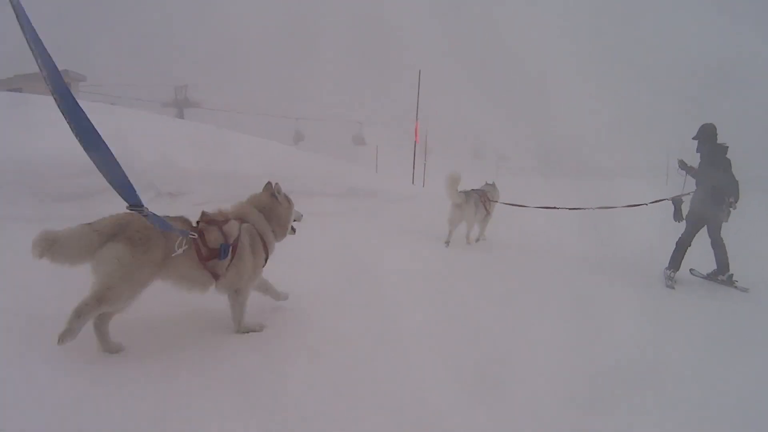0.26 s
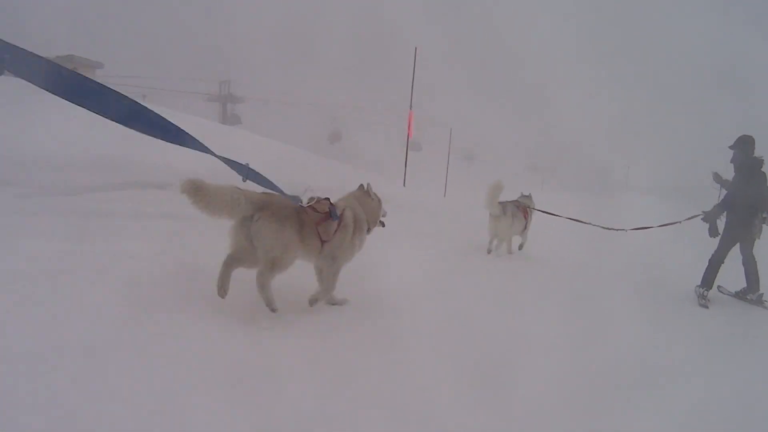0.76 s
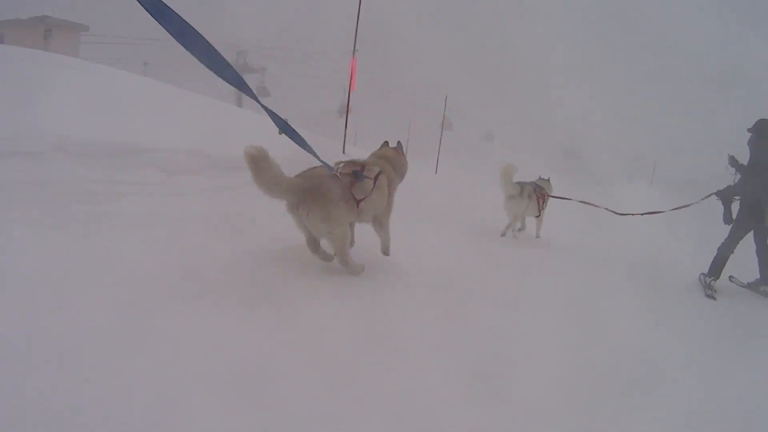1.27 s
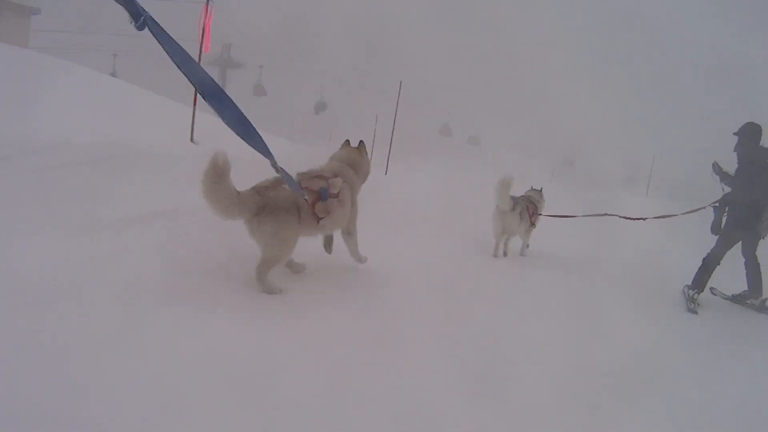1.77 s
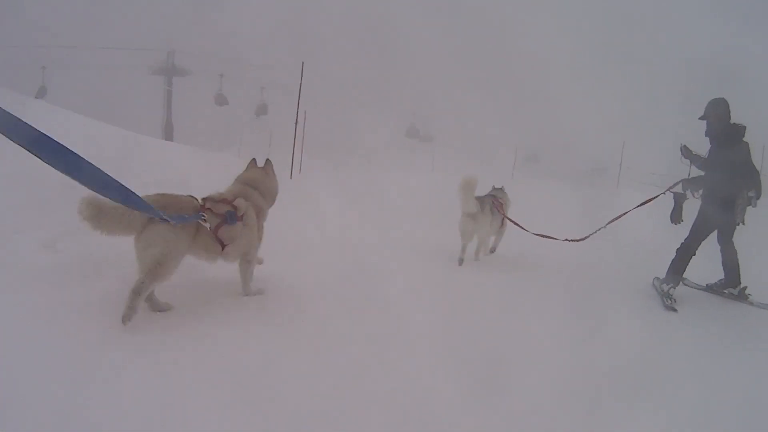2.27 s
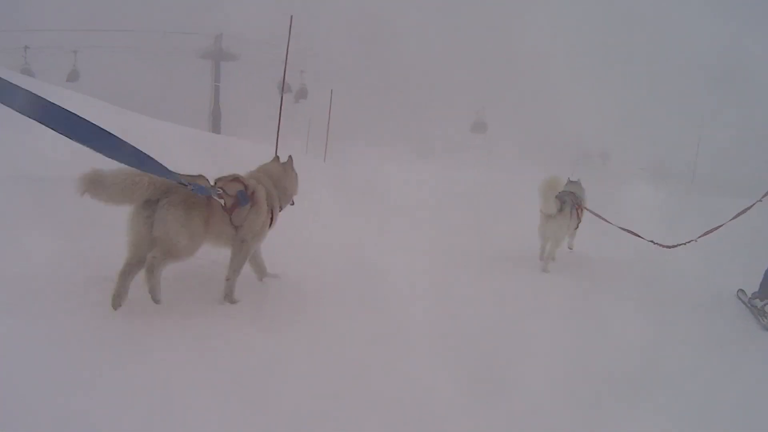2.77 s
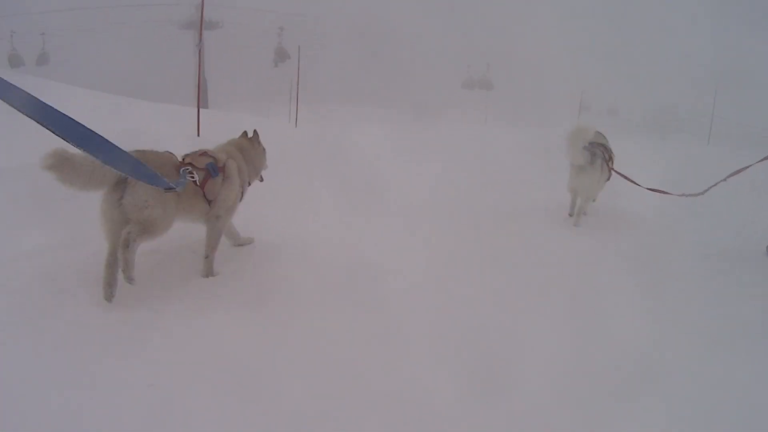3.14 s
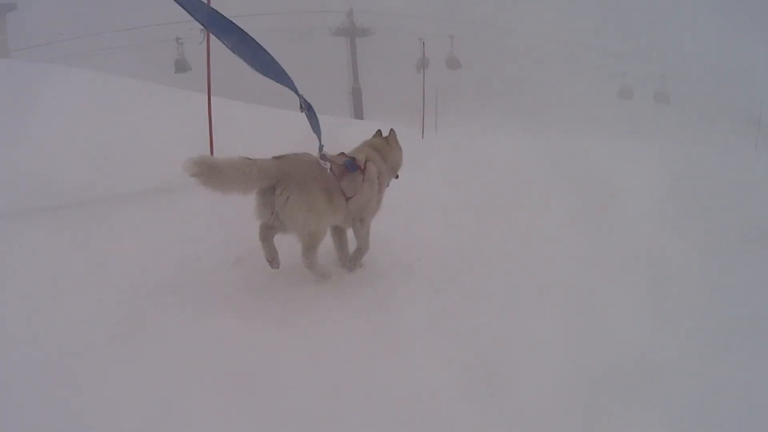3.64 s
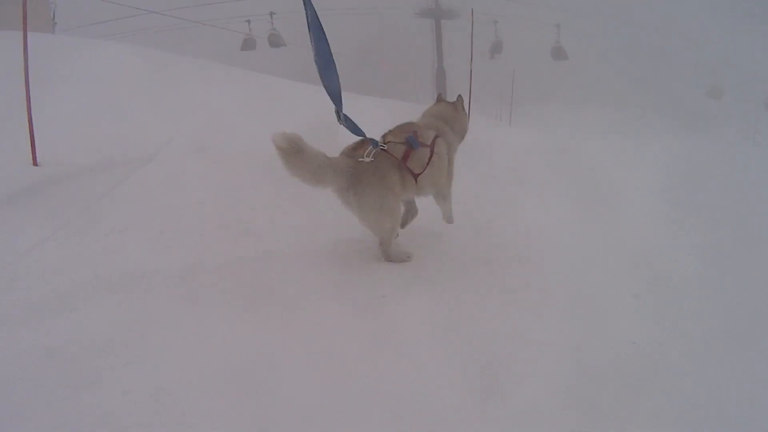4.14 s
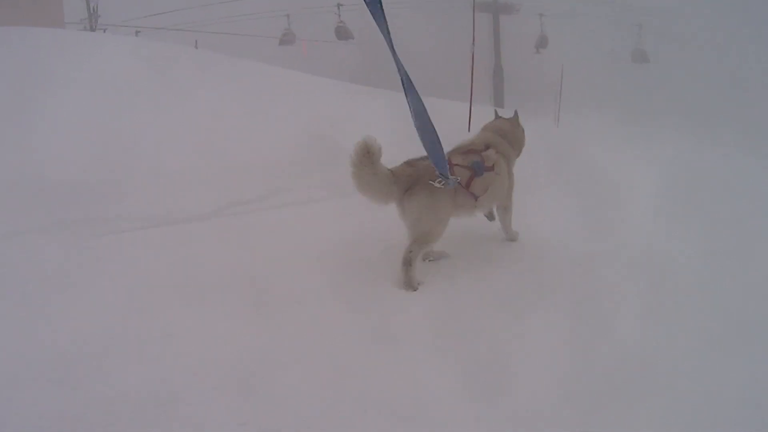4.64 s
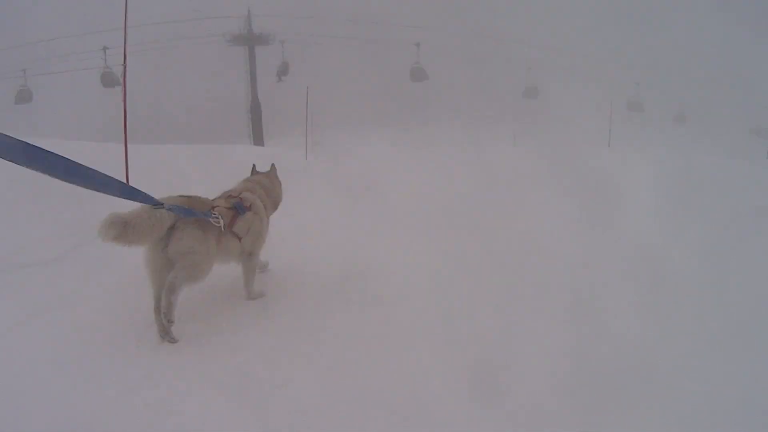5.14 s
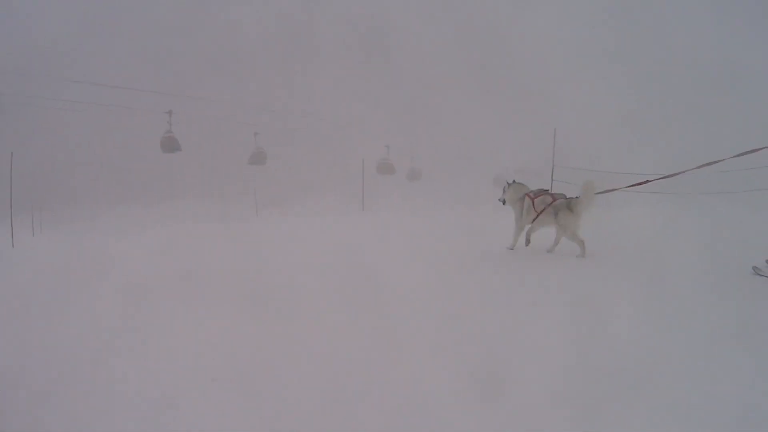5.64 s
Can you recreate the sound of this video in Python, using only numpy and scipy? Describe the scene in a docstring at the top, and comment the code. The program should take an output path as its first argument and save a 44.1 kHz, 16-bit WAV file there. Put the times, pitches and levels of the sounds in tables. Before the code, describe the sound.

Continuous gritty hiss of skis on hard, cold snow, outdoors, with a boxy, midrange-heavy, muffled camera sound in narrow stereo. Tiny cracks flutter quickly, joined by small ice ticks in the first second and a half, hollow crust crunches through the middle, then a fuller scrape with busier crackling and a sharp snap near the end. Wind is barely a rumble.

```python
"""Skis glide over cold snow, heard from inside a closed camera case. Snow crystals break under the bases as
a dense, lumpy stream of tiny cracks: noise of random grain size, split into coarse, middle and fine parts.
Crunches of crust are short swells of cracks around one pitch; snaps of ice are brief, slightly dull spits.
The case rings in broad modes that reach its two microphone ports differently, and scattered sound fills in.
A little wind rumbles underneath as low noise in short puffs."""
import sys
import numpy as np
from scipy import signal
from scipy.fft import rfft, irfft, next_fast_len
from scipy.io import wavfile
from scipy.ndimage import uniform_filter1d, map_coordinates

SR = 44100
rng = np.random.default_rng(int(sys.argv[2]) if len(sys.argv) > 2 else 0)


def store_pcm(level_fs):
    """Save levels as 16-bit WAV."""
    pcm = np.round(np.clip(level_fs, -1, 1) * 32767).astype(np.int16)
    wavfile.write(sys.argv[1], SR, np.atleast_2d(pcm).T)


N = 260190

# spectral shape of the wind, before levelling: (f/Hz, gain/dB)
WIND_COLOUR = [(12, -33), (20, 4.5), (140, -10), (200, -2), (260, -28), (440, -120)]
# stronger puffs of wind: (t/s, rise over the breeze/dB)
WIND_PUFFS = [(0.95, 9), (1.18, 7), (3.6, 4), (2.85, 5), (4.12, 11), (5.2, 7), (5.4, 11), (5.75, 0)]
# modes of the case: (f/Hz, width/Hz, left level/dB, left phase lag/rad, right level/dB, right phase lag/rad)
CASE_MODES = [(250, 170, -41.0, 2.48, -36.0, 2.66), (590, 260, -31.1, -3.0, -23.8, -2.45),
              (870, 160, -22.5, -2.41, -26.6, -2.98), (1190, 190, -3.8, -1.97, -9.7, -1.08),
              (1750, 310, -5.0, 2.48, -13.9, 2.31), (1490, 240, -7.1, -1.34, -22.3, 0.17),
              (2280, 610, -11.3, 2.18, -17.7, 1.64), (2600, 230, -14.6, 2.0, -19.5, 0.87),
              (3110, 510, 3.1, -0.36, -3.6, -1.06), (3270, 290, 1.8, -2.75, -1.4, -0.09),
              (3590, 860, -4.2, 2.2, -4.3, 2.92), (3760, 430, -10.4, -0.4, -9.6, 0.15),
              (5040, 760, -12.8, 2.48, -13.1, 2.17), (6730, 1380, -26.2, 2.94, -27.6, -2.43),
              (7410, 1220, -30.7, 0.08, -30.4, 2.6), (10530, 2540, -15.2, 2.65, -12.7, 2.84)]
# colour of the breaking crystals, on top of the modes: (f/Hz, gain/dB)
CRYSTAL_COLOUR = [(150, 0.5), (600, 1.5), (1400, 0), (2100, 1.5), (3200, 1), (5000, 1.5), (8000, 1.5),
                  (9800, -16.5), (10900, -30)]
# colour of sound scattered from all sides, unlike at the two ports: (f/Hz, gain/dB)
SCATTER_COLOUR = [(150, -37.5), (500, -30), (1200, -23), (2000, -20.5), (2500, -18), (3250, -13),
                  (4300, -22), (6000, -27), (7600, -26.5), (9500, -33.5), (10900, -60)]
# single hard snaps of ice, ahead of dulling and case: (t/s, level/dB)
ICE_SNAPS = [(0.073, -9.5), (0.532, -14), (0.902, -16), (1.054, -26), (1.098, -17), (1.256, -8),
             (1.301, -9), (1.44, -18), (1.464, -11), (1.472, -9), (2.253, -13), (3.288, -10), (4.255, -8),
             (5.33, -4), (5.353, -18), (5.458, -7.5), (5.506, -9), (5.712, -13), (5.86, -24)]
# the clearest crunches of crust, ahead of the case: (t/s, f/Hz, level/dB, swell time/s)
CRUST_CRUNCHES = [(0.28, 3120, -19, 0.0074), (0.374, 3060, -18, 0.008), (0.384, 4930, -17, 0.008),
                  (0.444, 2830, -17, 0.007), (0.575, 1330, -9, 0.0062), (0.66, 3760, -17, 0.008),
                  (0.842, 3400, -13, 0.0058), (0.844, 1410, -14, 0.0079), (1.06, 4050, -17, 0.0095),
                  (1.154, 1630, -10, 0.0051), (1.2, 3060, -14, 0.011), (1.298, 1230, -13, 0.01),
                  (1.47, 3000, -18, 0.0052), (1.505, 3040, -11, 0.003), (1.523, 3300, -17, 0.01),
                  (1.65, 1520, -18, 0.0061), (1.738, 5070, -16.5, 0.027), (1.76, 1560, -9.5, 0.011),
                  (1.814, 1170, -7.5, 0.0085), (1.942, 3240, -13, 0.0096), (2.025, 1170, -5, 0.0067),
                  (2.071, 1570, -11, 0.0099), (2.072, 3230, -12, 0.0078), (2.168, 1230, -10.5, 0.0063),
                  (2.39, 2980, -16.5, 0.019), (2.808, 1240, -10, 0.035), (2.99, 1260, -8.5, 0.012),
                  (3.359, 4630, -12, 0.0066), (3.407, 4970, -8, 0.0049), (3.408, 1250, -10, 0.011),
                  (3.72, 1240, -8, 0.008), (4.078, 1190, -10, 0.014), (4.267, 1410, -5.5, 0.0083),
                  (4.362, 1630, -12, 0.016), (4.364, 3340, -12, 0.0077), (4.683, 1230, -6, 0.016),
                  (4.824, 1180, -8, 0.01), (4.864, 1730, -8.5, 0.0091), (4.93, 1740, -10, 0.0075),
                  (5, 3440, -11, 0.014), (5.157, 1110, -6.5, 0.011), (5.198, 1610, -8.5, 0.022),
                  (5.232, 4700, -12, 0.014), (5.527, 3200, -16, 0.011), (5.536, 5850, -11, 0.0091),
                  (5.564, 3310, -11.5, 0.012), (5.715, 3050, -12, 0.0056), (5.75, 3340, -14, 0.0094),
                  (5.779, 3320, -14, 0.011), (5.783, 7270, -9, 0.0071), (5.784, 1620, -8, 0.01),
                  (5.867, 3200, -10, 0.006)]
# load on the skis, as the level of the scrape ahead of the case: (t/s, level/dB)
SKI_LOAD = [(0.0, -24.5), (0.33, -23), (0.79, -25.5), (0.84, -20), (0.89, -23), (1.22, -21.5),
            (1.36, -24.5), (1.48, -21), (2.32, -20.5), (2.4, -19), (2.58, -20), (2.71, -18), (5.26, -19.5),
            (5.44, -22), (5.57, -19.5), (5.6, -21.5), (5.8, -20.5), (5.9, -23.5)]
# how uneven the track is: (t/s, factor on the lumps)
TRACK_UNEVENNESS = [(0, 1.27), (1.5, 1.4), (2.6, 1.07), (5.0, 1.08), (5.9, 1.8)]

BREEZE_DB, BREEZE_SWELL_DB = -60, -1  # steady level, size of the slow random swell
PUFF_S = 0.059  # from the top of a puff to 1/e of its dB rise
CASE_GAIN_DB = 15.5  # from the snow to the ports
LEAN_DB, LEAN_DB_PER_S = 0.83, -0.23  # left over right: starts a little left, drifts to the right
SNAP_DECAY_S, SNAP_DULL_HZ = .0014, 4500
CRUNCH_WIDTH = 0.079  # half-width of the band, as a share of the pitch
SMALL_PER_S, SMALL_SWELL_S = 7, 0.0076  # smaller crunches fall by chance
SMALL_DB, SMALL_SPREAD_DB = 2.5, 4  # over the load, and up or down by chance
SMALL_LOW_HZ, SMALL_HIGH_HZ = 1070, 5100
COARSE_HZ, FINE_HZ = 2100, 5800  # coarse cracks lie below, fine cracks above
COARSE_DB, COARSE_GROWS, COARSE_WANDER_DB = 0.5, 0.83, .5  # trim, dB per dB of load, random wander
FINE_DB, FINE_GROWS, FINE_FADE_DB_PER_S = 2, 0.77, .5  # trim, dB per dB of load, dulling along the way
TOP_HZ = 10966  # upper band limit


def amp(db):
    """Turn dB into gain."""
    return 10 ** (np.asarray(db) / 20)


def unit(x):
    """Scale to rms 1."""
    return x / np.sqrt(np.mean(x ** 2) + 1e-20)


def along(points, hz):
    """Read a (f/Hz, value) table along a log frequency axis."""
    f, v = np.transpose(points)
    return np.interp(np.log(hz + 1), np.log(f + 1), v)


def curve(rows):
    """Draw a (t/s, value) table as one value per sample."""
    t, v = np.transpose(rows)
    return np.interp(np.arange(N) / SR, t, v)


def wobble(rate):
    """A smooth random curve with rate knots a second."""
    knots = rng.standard_normal(int(N * rate / SR) + 4)
    return map_coordinates(knots, [np.arange(N) * rate / SR])


def chatter(rate):
    """A random curve without slow drift: quick roughness only, as slow rises and falls come from the load."""
    x = wobble(rate)
    return x - uniform_filter1d(x, size=SR // 12)


def filtered(x, response):
    """Shape x by a complex response of frequency."""
    m = next_fast_len(N + SR // 2)
    return irfft(rfft(x, m) * response(np.fft.rfftfreq(m, 1 / SR)), m)[..., :N]


def cracks(channels, spread_db, patchy_db):
    """Tiny cracks: noise of spread grain size, with time-frequency patches of random gain."""
    size = amp(spread_db * np.minimum(rng.exponential(size=(channels, N)), 5.5))
    z = signal.stft(size * rng.standard_normal((channels, N)), nperseg=256)[2]

    def patches(tall, long):
        field = rng.standard_normal(z.shape[1:])
        field = uniform_filter1d(field, size=tall, axis=0)
        return unit(uniform_filter1d(field, size=long, axis=1))

    field = patches(tall=3, long=4) + 0.15 * patches(tall=4, long=12)  # small and large patches
    return unit(signal.istft(z * amp(patchy_db * field), nperseg=256)[1][:, :N])


def wind():
    """A soft low rumble, mostly common to both ports, in short puffs."""
    common, left, right = filtered(rng.standard_normal((3, N)), lambda hz: amp(along(WIND_COLOUR, hz)))
    pair = common + 0.41 * np.array([left, right])
    flutter_db = 3.2 * wobble(18) + 1.9 * wobble(25)
    puffs_db = sum(db * np.exp(-((np.arange(N) / SR - s) / PUFF_S) ** 2) for s, db in WIND_PUFFS)
    level_db = BREEZE_DB + BREEZE_SWELL_DB * wobble(4.12) + puffs_db
    return amp(level_db) * unit(pair * amp(flutter_db))


def case(x):
    """The straight stream rings the resonant modes; the scattered streams reach one port each."""
    def ports(hz):
        ring = 0
        for f, width, left_db, left_lag, right_db, right_lag in CASE_MODES:
            level = amp([[left_db], [right_db]])
            lag = np.array([[left_lag], [right_lag]])
            drive = width * (np.cos(lag) * 1j * hz + np.sin(lag) * f)
            ring = ring + level * drive / (f * f - hz * hz + 1j * hz * width)
        return ring * amp(along(CRYSTAL_COLOUR, hz))

    straight = filtered(x[:1], ports)
    scattered = filtered(x[1:], lambda hz: amp(along(SCATTER_COLOUR, hz)))
    return straight + scattered


def snaps():
    """Each snap of ice is a spit of noise that dies within milliseconds, a little dull."""
    out = np.zeros((3, N + SR))
    fade = np.exp(-np.arange(SR // 100) / SR / SNAP_DECAY_S)
    for s, db in ICE_SNAPS:
        spit = rng.standard_normal((3, len(fade))) * fade
        # every spit carries the same energy ahead of its level
        spit = spit / np.linalg.norm(spit, axis=1, keepdims=True) * np.linalg.norm(fade)
        start = round(s * SR)
        out[:, start:start + len(fade)] += amp(db) * spit
    return filtered(out[:, :N], lambda hz: 1 / (1 + 1j * hz / SNAP_DULL_HZ))


def small_crunches():
    """Chance rows like those of CRUST_CRUNCHES, louder under more load."""
    when, pitch, size = rng.random((int(SMALL_PER_S * N / SR), 3)).T
    load_db = curve(SKI_LOAD)[(when * N).astype(int)]
    level_db = load_db + SMALL_DB + SMALL_SPREAD_DB * (2 * size - 1)
    pitch_hz = SMALL_LOW_HZ * (SMALL_HIGH_HZ / SMALL_LOW_HZ) ** pitch
    return [(s, hz, db, SMALL_SWELL_S) for s, hz, db in zip(when * N / SR, pitch_hz, level_db)]


def crust():
    """Each crunch of crust is a short swell of cracks around one pitch."""
    hz, t, z = signal.stft(cracks(channels=3, spread_db=3.0, patchy_db=0.5), SR, nperseg=256)
    power = np.zeros(z.shape[1:])
    for s, pitch_hz, db, swell_s in CRUST_CRUNCHES + small_crunches():
        band = np.exp(-(np.log((hz + 1) / pitch_hz) / CRUNCH_WIDTH) ** 2)
        swell = np.exp(-((t - s) / swell_s) ** 2)
        power += amp(2 * db) * np.outer(band, swell)
    return signal.istft(z * np.sqrt(power), SR, nperseg=256)[1][:, :N]


def sizes(x):
    """Split cracks by pitch into coarse, middle and fine parts that add up to x."""
    def below(edge):
        return filtered(x, lambda hz: 1 / (1 + (hz / edge) ** 8))

    coarse = below(COARSE_HZ)
    fine = x - below(FINE_HZ)
    return coarse, x - coarse - fine, fine


def glide():
    """Breaking crystals in three streams that share the lumps of the track: one straight, two scattered."""
    load_db = curve(SKI_LOAD)
    mean_db = load_db.mean()
    swing_db = load_db - mean_db
    coarse_db = mean_db + COARSE_DB + COARSE_GROWS * swing_db + COARSE_WANDER_DB * wobble(6)
    fine_db = mean_db + FINE_DB + FINE_GROWS * swing_db - FINE_FADE_DB_PER_S * np.arange(N) / SR
    lumps_db = curve(TRACK_UNEVENNESS) * (0.48 * chatter(55) + 1.0 * chatter(110) + 1.04 * wobble(220))
    coarse, middle, fine = sizes(cracks(channels=3, spread_db=2.0, patchy_db=1.25))
    coarse = coarse * amp(coarse_db + 0.67 * lumps_db + 1.0 * chatter(45))
    middle = middle * amp(load_db + lumps_db)
    fine = fine * amp(fine_db + 0.42 * lumps_db + 0.71 * chatter(60))
    return coarse + middle + fine


def scene():
    """Everything under the skis reaches the ports through the case; the wind is added at the ports."""
    half_lean_db = (LEAN_DB + LEAN_DB_PER_S * np.arange(N) / SR) / 2
    skis = amp(CASE_GAIN_DB) * case(glide() + crust() + snaps())
    return skis * amp([half_lean_db, -half_lean_db]) + wind()


def record(dry):
    """Peaks round off softly; the camera keeps nothing above its band limit."""
    soft = dry / (1 + np.abs(dry / .72) ** 4) ** (1 / 4)
    return filtered(soft, lambda hz: hz < TOP_HZ)


dry = scene()
out = record(dry)
store_pcm(out)
```